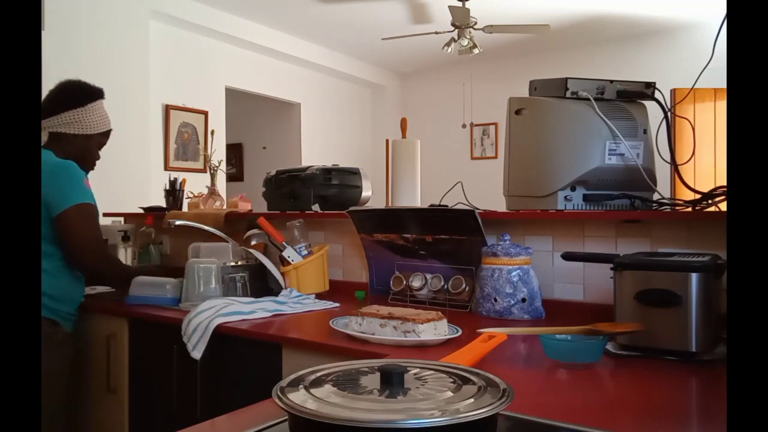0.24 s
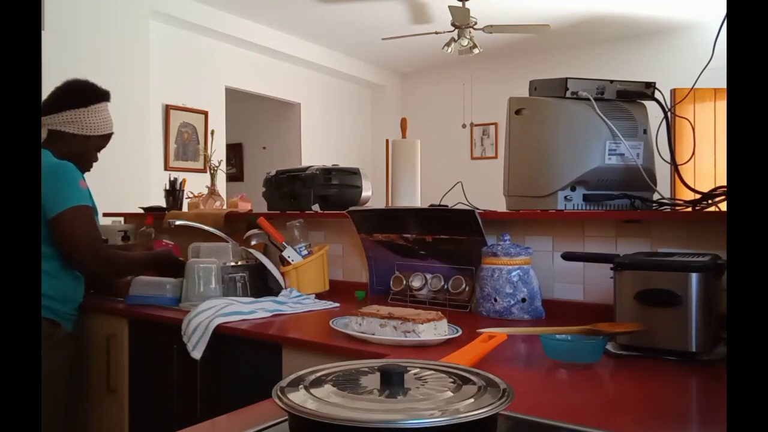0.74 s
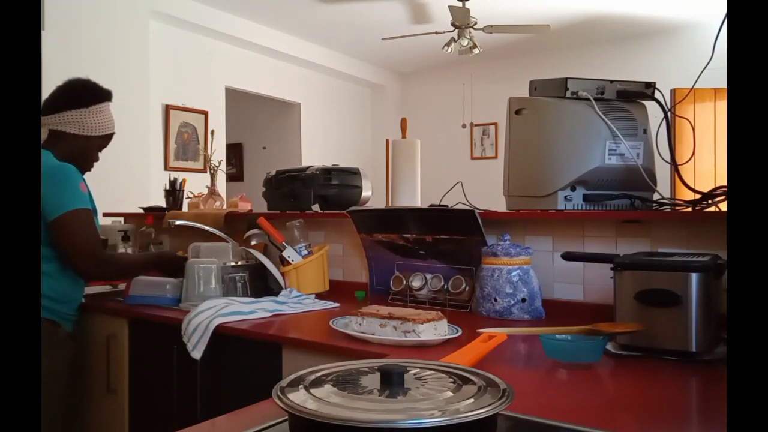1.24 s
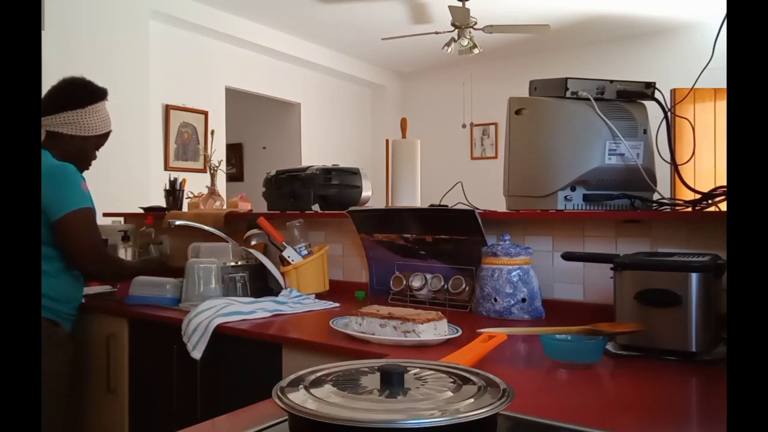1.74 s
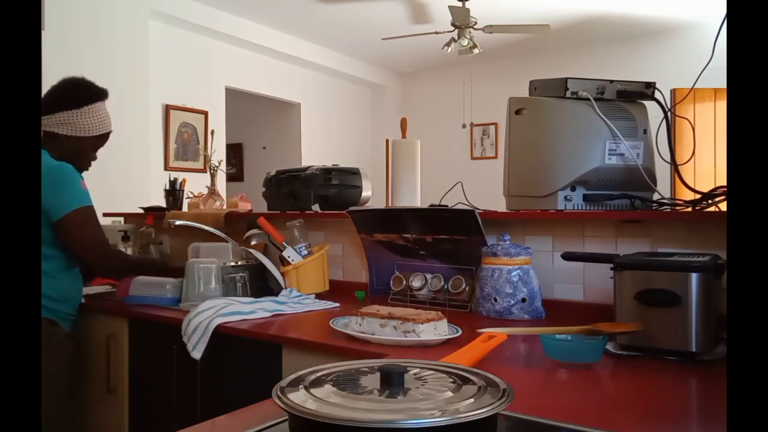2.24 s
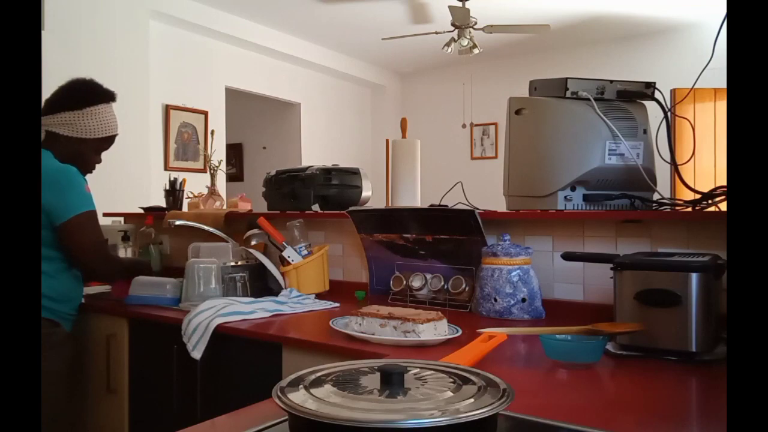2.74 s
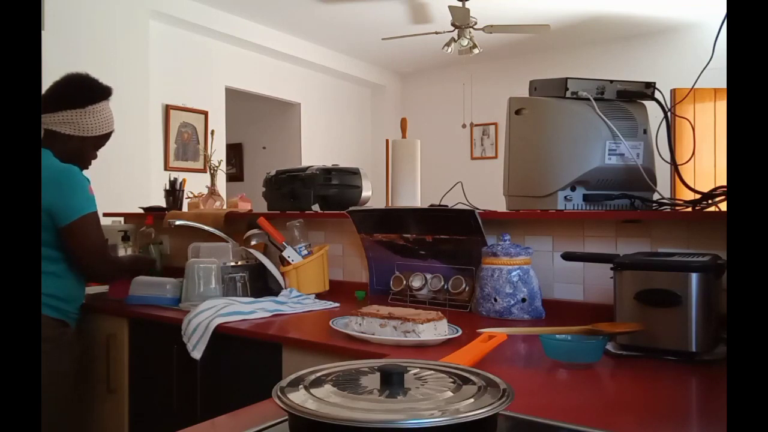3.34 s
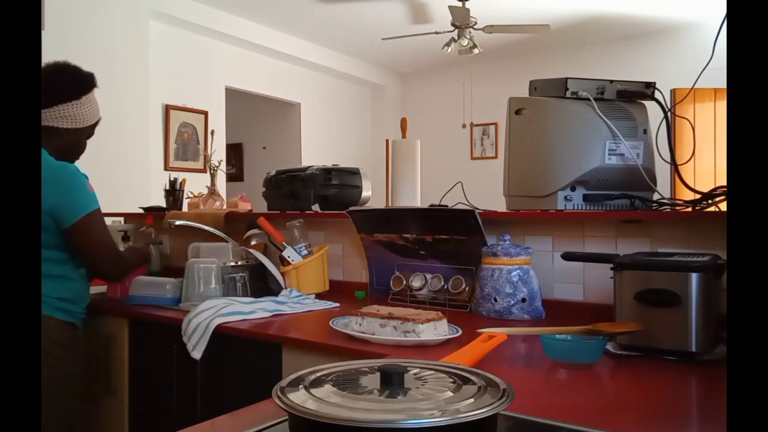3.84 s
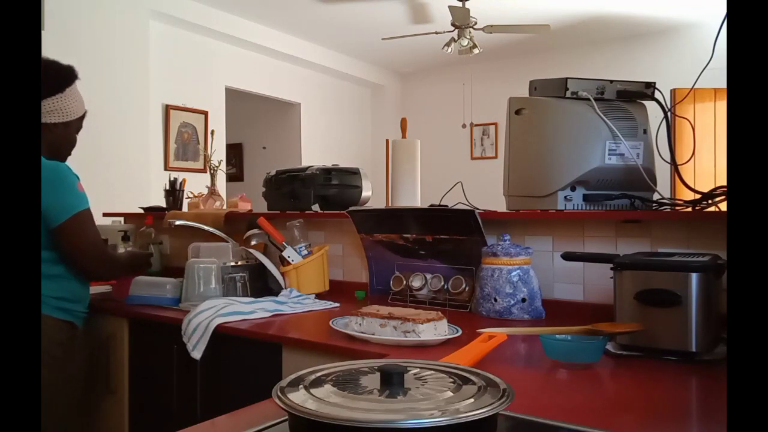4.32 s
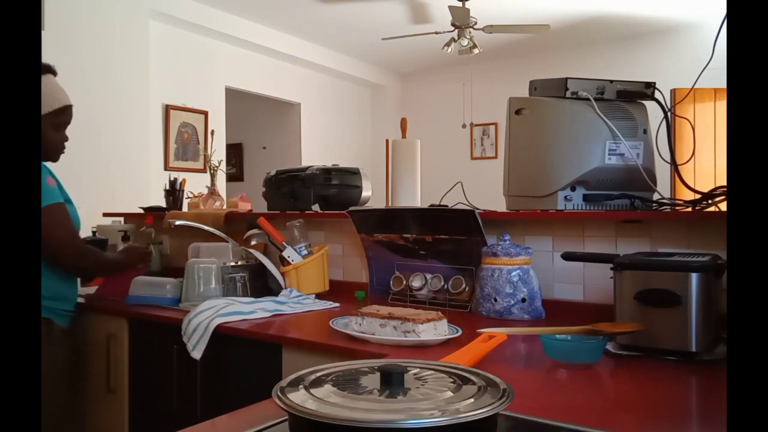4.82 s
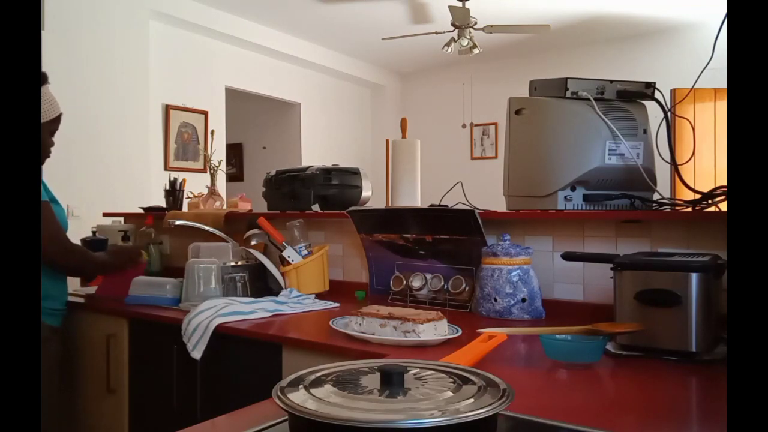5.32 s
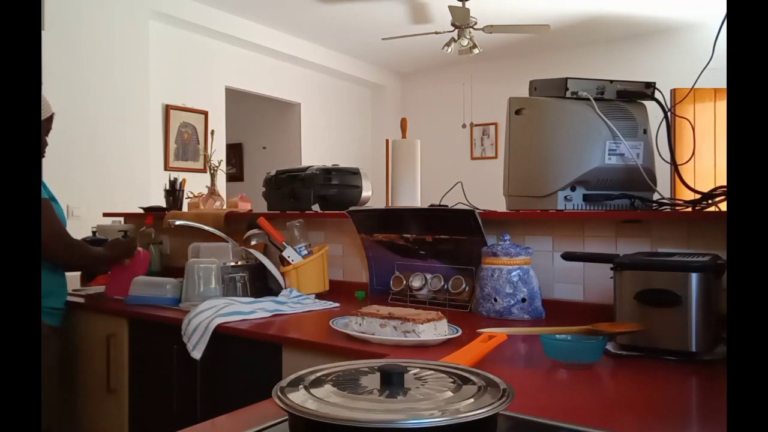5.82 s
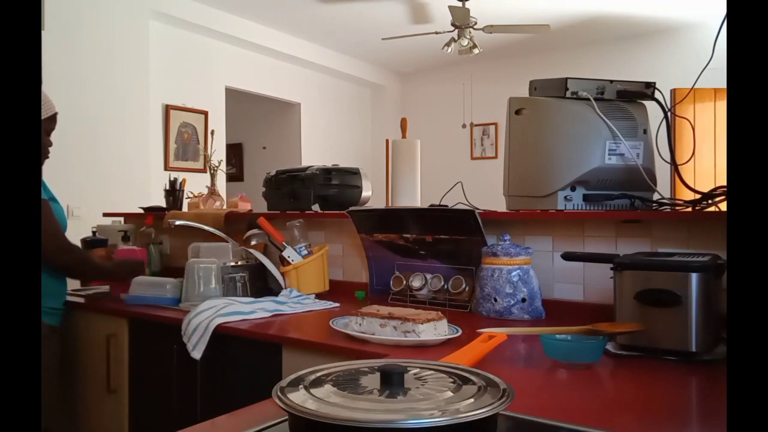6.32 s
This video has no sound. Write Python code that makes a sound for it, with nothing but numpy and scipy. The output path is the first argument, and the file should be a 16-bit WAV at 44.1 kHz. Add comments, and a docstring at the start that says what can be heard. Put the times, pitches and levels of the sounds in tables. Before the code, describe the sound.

A home kitchen is heard from across the counter, with short room reverberation, faint refrigerator hum, steady air and slight rubbing. From 0 to 0.4 s, wooden knocks come quickly, the strongest near 0.2 s with a bright crack, low panel note and drawer rattle. Lighter knocks follow around 0.75 s, then a duller cluster with rattling from 0.97 to 1.2 s. Between 1.4 and 3.2 s it is quiet, with brief cloth and hand swishes. A thin hinge squeak rises at 3.25-3.4 s into a loud cupboard bang at 3.42 s, with rattle and bouncing low thuds until about 4 s. A hollow steel vessel is softly bumped at 4.1 s and more clearly at 4.8 s, with a weaker touch at 4.9 s. Soft rustles continue; a faint squeak at 5.9 s precedes dull, boomy door thuds from 6.06 to 6.35 s and a last swish.

```python
"""A home kitchen heard from across the counter, over the hum of a refrigerator and faint rubbing.
Knocks on wood with panel notes and a rattling drawer come first; then cloth and hands swish more quietly.
A hinge squeaks before a loud bang with a rattle; then a hollow steel vessel is bumped at the sink.
Near the end a hinge squeaks again before the last blows. Knocks and swishes are shaped noise, panel notes
and the vessel are decaying tones, squeaks are unsteady stacks of overtones, and the room rings on after."""
import sys
import numpy as np
from scipy import signal
from scipy.fft import rfft, irfft, next_fast_len
from scipy.io import wavfile
from scipy.ndimage import map_coordinates

SR = 44100
rng = np.random.default_rng(int(sys.argv[2]) if len(sys.argv) > 2 else 0)


def persist_wave(psi):
    """Save psi, clipped to +-1, as 16-bit WAV."""
    counts = np.round(np.clip(psi, -1, 1) * 32767).astype(np.int16)
    wavfile.write(sys.argv[1], SR, np.atleast_2d(counts).T)


N = 289560
TIME = np.arange(N) / SR  # seconds
TOP_HZ = 15600  # upper limit of the microphone

# Resonances of door and carcass. Each row: pitch in Hz, distance in Hz at which the gain has halved,
# relative gain in dB.
WOOD = [(210, 41, -11), (309.8, 2.2, 1.5), (364.3, 8.6, -10), (434, 3.3, -3.5), (489, 3.6, -4),
        (577, 7.7, -8), (862.5, 6.6, -3), (996, 4.8, -2), (1180, 11, -24), (1584, 12, -12), (2336, 6.5, -5),
        (2680, 32, -10.5), (3660, 196, -9.5)]


def amp(db):
    """Turn decibels into a plain factor."""
    return 10 ** (np.asarray(db) / 20)


def unit(x):
    """Scale a sound to an rms level of 1."""
    return x / np.sqrt(np.mean(x ** 2) + 1e-20)


def along(points, hz):
    """Read a curve of (Hz, value) points at any frequency, on a log axis."""
    f, v = np.transpose(points)
    return np.interp(np.log(hz + 1), np.log(f + 1), v)


def wobble(rate):
    """A smooth random curve through `rate` random points a second."""
    points = rng.standard_normal(int(N * rate / SR) + 4)
    return map_coordinates(points, [TIME * rate])


def filtered(x, response):
    """Weigh each frequency of x by response(hz)."""
    n = x.shape[-1]
    m = next_fast_len(n + SR // 4)  # spare room at the end, against wrapping round
    hz = np.fft.rfftfreq(m, 1 / SR)
    return irfft(rfft(x, m) * response(hz), m)[..., :n]


def noise(spectrum):
    """Steady noise coloured by (Hz, dB) points, with an rms level of 1."""
    white = rng.standard_normal(N)
    return unit(filtered(white, lambda hz: amp(along(spectrum, hz))))


def modes(table, f, gains=None):
    """Summed gain of a table of resonances (laid out like WOOD) at frequencies f."""
    gains = np.ones(len(table)) if gains is None else gains
    return sum(gain * amp(db) * width ** 2 / ((f - center) ** 2 + width ** 2)
               for gain, (center, width, db) in zip(gains, table))


def swell(start, length, rise, t60):
    """Rise, hold to the end of the gesture, then die away by 60 dB in t60 seconds."""
    t = TIME - start
    onset = np.sin(np.pi / 2 * np.clip(t / rise, 0, 1)) ** 2
    return onset * amp(-60 * np.maximum(t - length, 0) / t60)


def add(out, s, x):
    """Mix x in from time s in seconds."""
    i = max(round(s * SR), 0)
    out[i:i + len(x)] += x[:N - i]


def tail(share):
    """A blow as the room returns it: noise in which each frequency dies at its own speed."""
    # Each row: frequency in Hz, seconds to fall by 60 dB before the share is applied.
    room_decay = [(60, 1), (160, 0.88), (420, 0.46), (1100, 0.57), (3000, 0.42), (8000, 0.39),
                  (15000, 0.27)]
    hz, t, z = signal.stft(rng.standard_normal(SR), SR, nperseg=256)
    t60 = np.clip(share, .1, 2) * along(room_decay, hz)[:, None]
    return signal.istft(z * amp(-60 * t / t60), SR, nperseg=256)[1][:SR]


def ring(hz, rise, t60, rough):
    """One decaying tone; the walls' echoes make its level and phase waver."""
    t = TIME[:SR]
    waver = wobble(25.0)[:SR] + 1j * wobble(28.4)[:SR]
    echoes = rough * waver * (1 - np.exp(-t / 0.016))  # the echoes take a moment to arrive
    tone = np.imag((1 + echoes) * np.exp(2j * np.pi * hz * t))
    return tone * amp(-60 * t / t60) * (1 - np.exp(-(t / rise) ** 2))


def background():
    """The compressor hums on a few steady pitches that waver slightly, over steady room air."""
    # Compressor hum. Each row: pitch in Hz, level in dB before 2 dB are added.
    hum_lines = [(49, -63.5), (99, -64), (147.5, -54.5), (587, -68.5)]
    # Room air and microphone hiss. Each row: frequency in Hz, relative level in dB per Hz.
    air_colour = [(15, -58), (30, -24), (62, -10), (110, 1.5), (148, -0.5), (185, -18), (450, -10.5),
                  (600, -9), (830, -19.5), (1500, -20), (2700, -34), (4600, -31.5), (7000, -23.5),
                  (9500, -29), (15500, -30)]
    air_db = -54
    hum = np.zeros(N)
    for hz, db in hum_lines:
        level = amp(db + 2 + 0.56 * wobble(11))
        hum += level * np.sin(2 * np.pi * hz * TIME + 0.25 * wobble(1.97))
    return hum + amp(air_db) * noise(air_colour)


def knocks():
    """Each blow has its own colour (soft = dull), rings the wood anew and builds up as the walls answer."""
    # Knocks on wood and worktop. Each row: start in seconds, relative levels in dB of body, thump
    # and crack, fall of the treble in dB per octave.
    blows = [(0.0, -16, -10, -26, 5), (0.119, -18.5, -11, -29, 7), (0.197, -17, -29, -33, 7),
             (0.206, -7.5, -9.5, -14.5, 6), (0.249, -9.5, -26, -21.5, 14), (0.329, -21.5, -33, -28, 7),
             (0.389, -19, -21, -31.5, 7), (0.534, -27, -41, -35.5, 9), (0.752, -17.5, -14.5, -23, 9),
             (0.809, -23, -41, -30.5, 9.5), (0.967, -22.5, -6, -33, 7), (1.009, -20, -19, -28, 19),
             (1.049, -20.5, -7, -21.5, 8), (1.109, -18.5, -11, -26, 6.5), (1.154, -23, -15.5, -26, 24),
             (1.198, -22, -40, -30, 25), (2.462, -37, -23, -62, 3), (2.499, -32.5, -27, -74, 1),
             (2.951, -37.5, -28, -45, 15), (3.186, -36.5, -27.5, -37, 14), (3.409, -31, -1.5, -26, 15),
             (3.417, -8.5, -7, -11.5, 15.5), (3.445, -9, -14, -14.5, 15), (3.485, -21.5, -6, -19.5, 16),
             (3.52, -28, -19, -26, 16), (3.656, -14.5, -5, -25.5, 14), (3.73, -33, -11, -34, 33),
             (3.828, -26.5, -13.5, -38.5, 24), (4.214, -38, -35, -50, 5), (4.658, -42, -23, -31.5, 11),
             (4.779, -24.5, -30, -18, 5.5), (4.904, -31.5, -33, -29.5, 5.5), (5.39, -33.5, -31, -54.5, 3),
             (5.423, -44, -48, -55, 3), (5.68, -48, -55, -44, 5), (6.064, -23.5, -6.5, -27, 34),
             (6.109, -25.5, -19, -54, 12), (6.225, -38.5, -28, -67, 12), (6.33, -50, -21, -58, 8)]
    # Colours of the thump and of the body. Each row: frequency in Hz, dB added to that part's level.
    thump_colour = [(30, -13), (70, 2.5), (130, 14)]
    body_colour = [(250, 6), (550, 10)]
    # Soft, heavy contacts build up slower. Each row: crack minus body in dB, build-up time constant in s.
    build_up = [(-39, 0.0055), (-22, 0.0029), (26, 0.00047)]
    crack_hz, edge_hz, flat_hz = 2150, 8640 * 0 + 4200, 8640  # the treble falls from first to last
    edge_share = 0.39  # the fall starts gently: its share reached at edge_hz
    dull_fall = 10.2  # dB per octave; in the top octave duller blows go on falling, brighter ones rise
    ring_share = 0.94  # share of the room's decay time
    out, t = np.zeros(N), TIME[:SR]
    for s, body, thump, crack, fall in blows:
        drop = fall * np.log2(flat_hz / crack_hz)
        treble = crack + 5
        colour = [(hz, thump + db) for hz, db in thump_colour]
        colour += [(hz, body + db) for hz, db in body_colour]
        colour += [(crack_hz, treble), (edge_hz, treble - edge_share * drop), (flat_hz, treble - drop),
                   (TOP_HZ, treble - drop - (fall - dull_fall))]
        struck = 1.13 * amp(rng.normal(0, 5.7, len(WOOD)))  # every blow excites the wood differently
        rise = 1 - np.exp(-t / np.interp(crack - body, *np.transpose(build_up)))
        rise *= 1 + .5 * np.exp(-t / 0.0068)  # the direct sound stands over the tail
        blow = filtered(tail(ring_share),
                        lambda hz: amp(along(colour, hz)) * (0.52 + modes(WOOD, hz, struck)))
        add(out, s, rise * blow)
    return out


def swishes():
    """Cloth hisses quite evenly; hands and objects rub with a coarser grain."""
    # Cloth and hands. Each row: start in seconds, length in seconds, hiss level in dB, rub level in dB.
    gestures = [(0.502, 0.038, -66, -61), (1.476, 0.033, -59, -63), (1.883, 0.055, -54, -60.5),
                (2.256, 0.028, -62, -69), (2.421, 0.11, -56.5, -57.5), (2.595, 0.1, -50.5, -56),
                (2.74, 0.043, -68, -66), (3.066, 0.097, -67, -57.5), (3.17, 0.27, -56, -55),
                (3.644, .19, -55.5, -53.5), (3.922, 0.13, -48, -58), (4.1, .17, -69, -58.5),
                (4.4, 0.2, -67, -60.5), (4.665, 0.082, -57, -58), (5.13, 0.04, -57, -67),
                (5.254, .05, -62, -62), (5.39, .07, -61, -64), (5.523, 0.15, -54, -58.5),
                (6.004, 0.11, -56.5, -61), (6.177, 0.24, -57, -61), (6.379, 0.13, -50.5, -52)]
    # Colours of the hiss and of the rub. Each row: frequency in Hz, relative level in dB per Hz.
    cloth_colour = [(1500, 1.5), (2500, -39), (3700, 2.5), (5000, 1.5), (7000, 9.5), (10000, 6.5),
                    (15500, 9)]
    rub_colour = [(200, -25), (450, -4), (1500, -2), (3700, -5), (6000, -14), (9000, -40)]
    rise_s, t60_s = 0.049, 0.35
    stir_db = -65  # a faint rubbing that never stops
    cloth = noise(cloth_colour) * amp(.8 * wobble(30))
    rub = noise(rub_colour) * amp(2.5 * wobble(40))
    out = amp(stir_db + 2.6 * wobble(8.7)) * rub
    for s, length, hiss_db, rub_db in gestures:
        gesture = amp(hiss_db) * cloth + amp(rub_db) * rub
        out += swell(s, length, rise_s, t60_s) * gesture
    return out


def panels():
    """A panel or board sounds its own note; a door that bounces repeats it."""
    # Notes that stand out of a blow. Each row: start in seconds, level in dB, pitch in Hz,
    # seconds to fall by 60 dB.
    notes = [(.003, -17.5, 194, 0.16), (.022, -21, 461.5, 0.13), (0.206, -16.5, 2760, .035),
             (0.209, -13, 183, 0.33), (.279, -14.5, 183, 0.14), (.33, -23.5, 122, 0.32),
             (.755, -16.5, 994, 0.12), (0.801, -23, 965, 0.1), (.98, -21, 130.5, .6),
             (1.052, -30, 182, 0.49), (1.199, -36.5, 96, 1.16), (2.421, -37, 59, .7),
             (3.42, -14.5, 123, 0.55), (3.422, -17, 2264, .058), (3.48, -19, 673, .12),
             (3.665, -25, 557, .26), (3.721, -14, 123, 0.12), (3.82, -31, 133, 0.23),
             (3.881, -19, 127, 0.16), (3.969, -24, 128.7, 0.24), (4.07, -41, 616, 0.16),
             (4.789, -30.5, 130, 0.34), (5.98, -41, 219, .11), (6.061, -13, 132.2, .26),
             (6.082, -13, 134, 0.16), (6.112, -10.5, 134, .18), (6.222, -12.5, 133, 0.061),
             (6.251, -17.5, 147, 0.087), (6.329, -25, 122, 0.23)]
    out = np.zeros(N)
    for s, db, hz, t60 in notes:
        rise = 0.0031 * (1000 / hz) ** 0.5  # seconds: lower notes start slower
        add(out, s, amp(db) * ring(hz, rise, t60, rough=0.32))
    return out


def drawers():
    """Runners and contents chatter: uneven small knocks over a rumble, ringing the wood."""
    # Drawer and door rattles. Each row: start in seconds, length in seconds, relative level in dB,
    # relative brightness in dB.
    rattles = [(0.214, 0.14, -24.5, -3.5), (0.971, .2, -25, -9), (3.416, 0.07, -25, -34)]
    # Colour of the rattle. Each row: frequency in Hz, relative level in dB per Hz.
    rattle_colour = [(41, -36), (70, -31), (126, -4.5), (278, -19.5), (318, -4.5), (686, -14.5),
                     (822, -8.5), (1050, -16), (3490, -31.5), (15500, -49.5)]
    rise_s, t60_s = 0.011, 0.38
    out = np.zeros(N)
    for s, length, db, bright_db in rattles:
        ticks = (rng.random(N) < 180 / SR) * amp(rng.normal(0, 2.5, N))  # about 180 a second
        bursts = signal.fftconvolve(ticks, np.exp(-TIME[:4000] / .006))[:N]
        chatter = unit(noise(rattle_colour) * (.5 + bursts))
        high = filtered(chatter, lambda hz: hz ** 2 / (hz ** 2 + 4000 ** 2))
        bright = chatter + amp(bright_db) * 2 * high
        wooden = filtered(bright, lambda hz: 0.52 + 1.7 * modes(WOOD, hz))
        out += swell(s, length, rise_s, t60_s) * amp(db) * wooden
    return out


def hinges():
    """Stick and slip at an unsteady rate gives a fuzzy stack of overtones; the scraping rings the pin."""
    # Hinge squeaks. Each row: start in seconds, length in seconds, first and final slip rate in Hz,
    # settling time constant in seconds, level in dB, level of the ringing pin in dB.
    squeaks = [(3.245, .05, 1000, 1150, .06, -54, -61), (3.292, .07, 1200, 1560, .1, -52, -61),
               (3.362, .05, 1560, 1950, .07, -51, -56), (5.892, .13, 1420, 1225, .032, -55.5, -85)]
    # What the door radiates of the slips. Each row: frequency in Hz, relative level in dB.
    door_colour = [(900, -8), (1300, 1), (2100, -1), (2500, 2), (2750, -4), (3000, -5), (3750, -2),
                   (4200, -9), (5100, -12), (6500, -25), (9000, -45)]
    # Resonances of the rubbed hinge pin. Each row: pitch in Hz, distance in Hz at which the gain
    # has halved, relative gain in dB.
    pin_modes = [(3320, 45, 0), (5050, 45, -3), (5520, 45, -3), (6750, 60, -12)]
    rise_s, t60_s = .015, .12
    out = np.zeros(N)
    pin = unit(filtered(rng.standard_normal(N), lambda hz: modes(pin_modes, hz)))
    for s, length, first_hz, settled_hz, settle, db, pin_db in squeaks:
        hz = settled_hz + (first_hz - settled_hz) * np.exp(-np.maximum(TIME - s, 0) / settle)
        phase = 2 * np.pi * np.cumsum(hz * (1 + .021 * wobble(260))) / SR
        stack = np.zeros(N)
        for k in range(1, 7):  # slip rate and its overtones
            stack += amp(along(door_colour, k * hz) + 4.5 * wobble(80)) * np.sin(k * phase)
        out += swell(s, length, rise_s, t60_s) * (amp(db) * stack + amp(pin_db) * pin)
    return out


def vessel():
    """A bumped steel vessel rings at its own pitches; a soft bump reaches mainly the lowest ones."""
    # Bumps. Each row: start in seconds, level in dB, extra dB for the modes above 900 Hz,
    # share of the free decay time.
    bumps = [(4.108, -29, -17, 0.49), (4.152, -34.5, -16, 0.78), (4.781, -22.5, 0.5, 1),
             (4.906, -36, 2, 0.75)]
    # Modes of the vessel. Each row: pitch in Hz, relative level in dB, seconds to fall by 60 dB when free.
    vessel_modes = [(300, -9, .3), (321, 0, .45), (492, -1, .4), (512, -6, .35), (619, -12, .4),
                    (797, -16, .4), (1001, -14, .35), (1150, -9, .25), (1217, -4, .28), (1346, -4, .3),
                    (1879, -10, .2), (3467, -18, .15), (3666, -14, .15), (4048, -18, .15), (4398, -18, .15)]
    out = np.zeros(N)
    for s, db, upper_db, free in bumps:
        for hz, level, t60 in vessel_modes:
            strength = amp(db + level + upper_db * (hz > 900) + rng.normal(0, 1.5))
            add(out, s, strength * ring(hz, .008, free * t60, rough=.4))
    return out


def scene():
    """Add all sounds; hinges and drawers get an echo from the room, 4 dB down."""
    near = hinges() + drawers()
    echo = tail(1.0)
    wet = signal.fftconvolve(near, echo / np.linalg.norm(echo))[:N]
    mix = near + amp(-4) * wet
    mix += knocks() + panels() + vessel() + swishes() + background()
    return mix[None]


def record(dry):
    """The microphone drops the deep bass and keeps nothing above its band limit."""
    return filtered(dry, lambda hz: (hz < TOP_HZ) * hz ** 2 / (hz ** 2 + 45 ** 2))


dry = scene()
out = record(dry)
persist_wave(out)
```